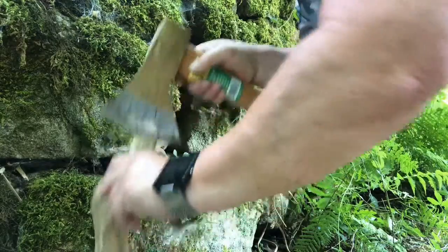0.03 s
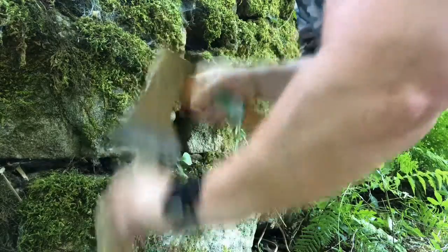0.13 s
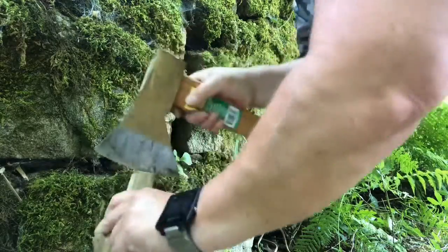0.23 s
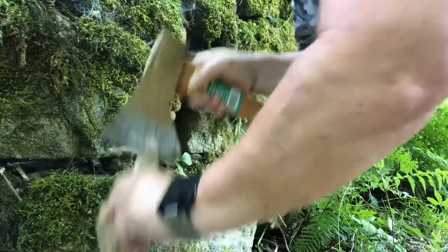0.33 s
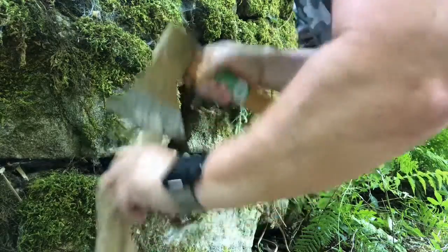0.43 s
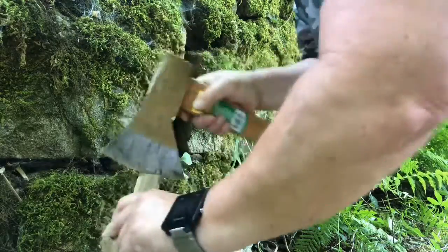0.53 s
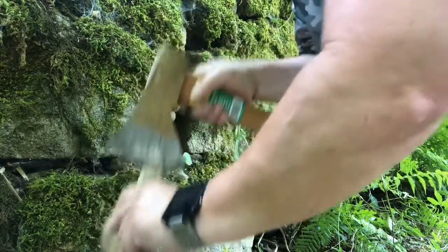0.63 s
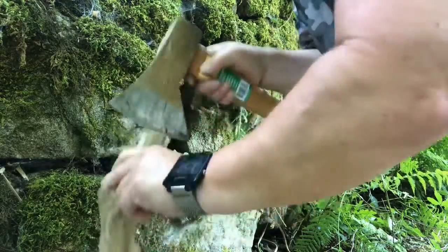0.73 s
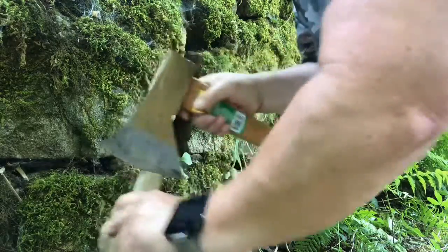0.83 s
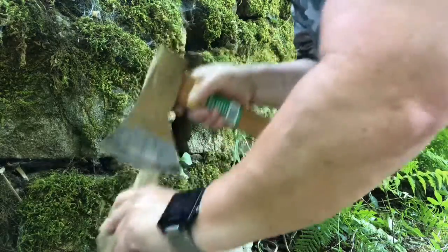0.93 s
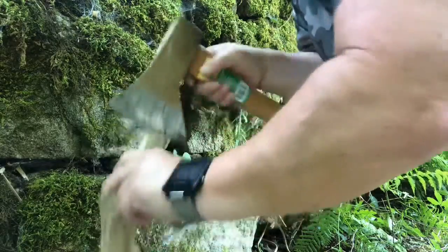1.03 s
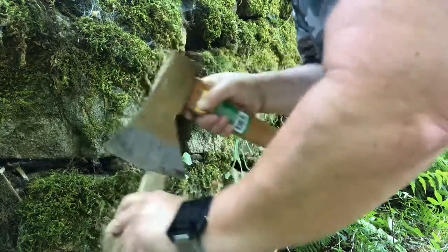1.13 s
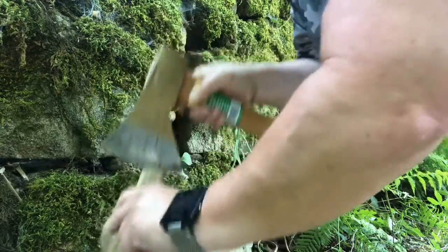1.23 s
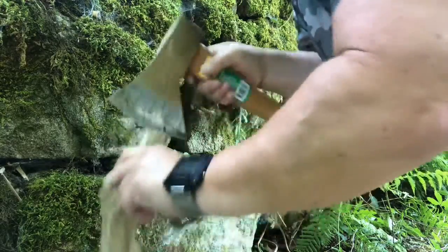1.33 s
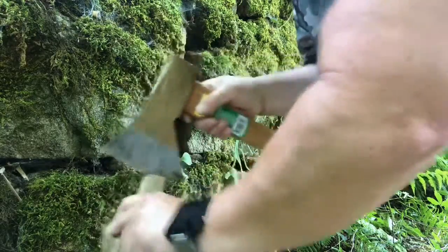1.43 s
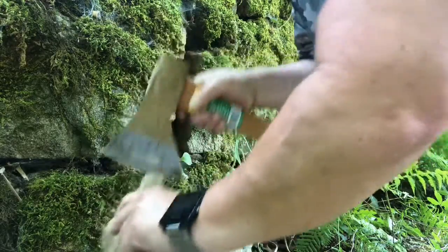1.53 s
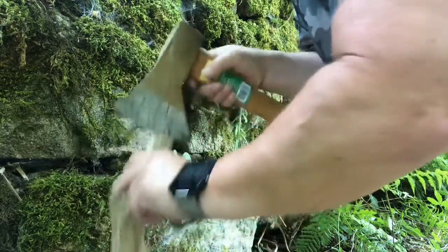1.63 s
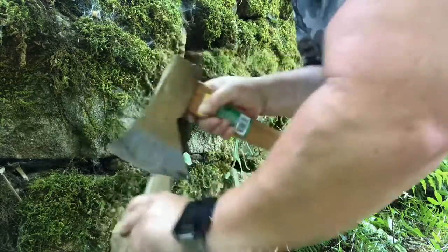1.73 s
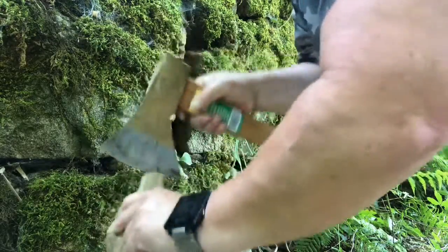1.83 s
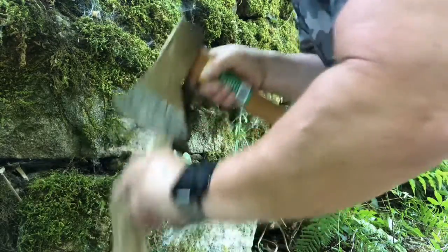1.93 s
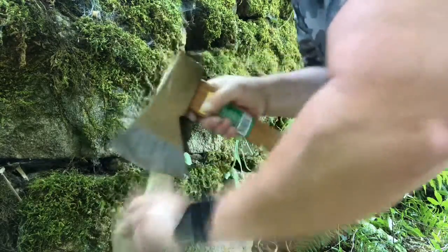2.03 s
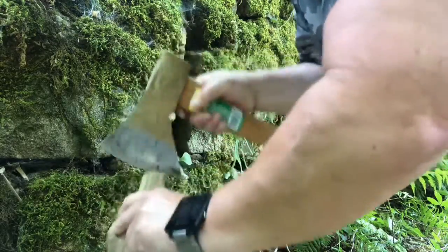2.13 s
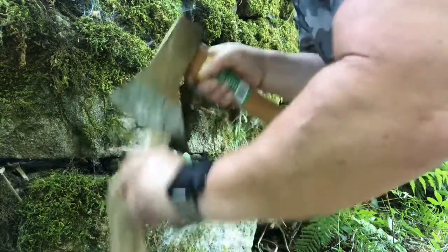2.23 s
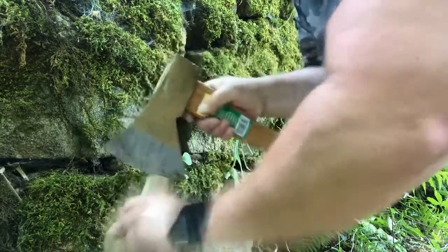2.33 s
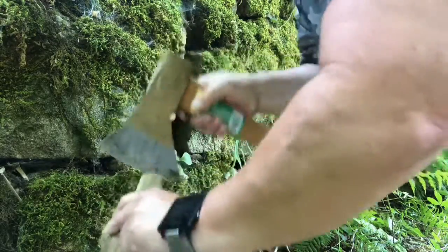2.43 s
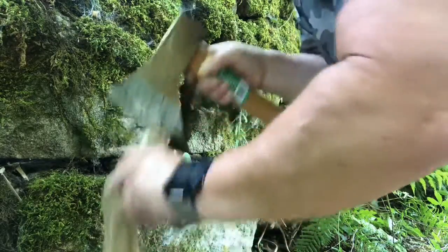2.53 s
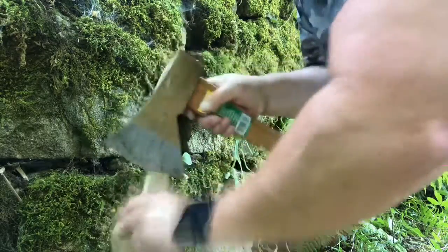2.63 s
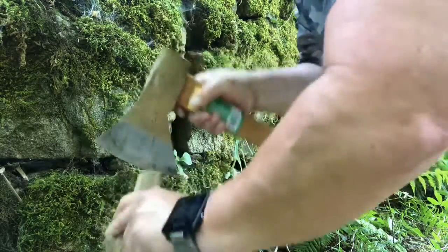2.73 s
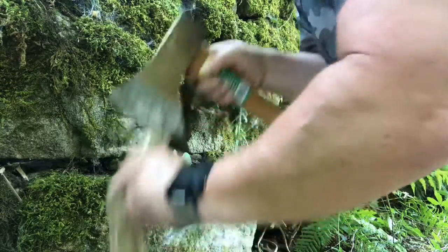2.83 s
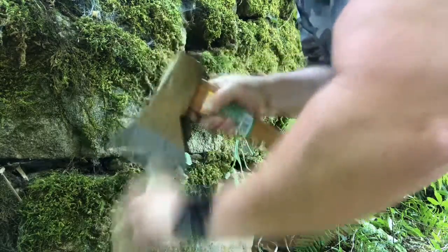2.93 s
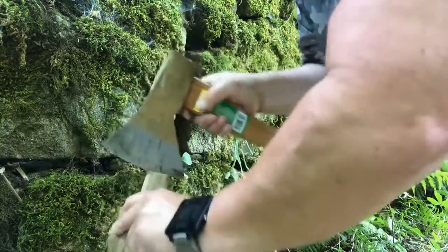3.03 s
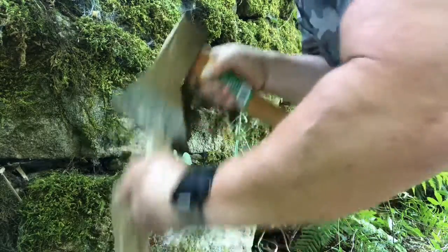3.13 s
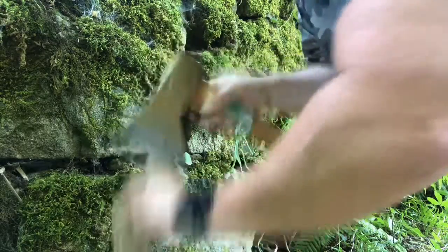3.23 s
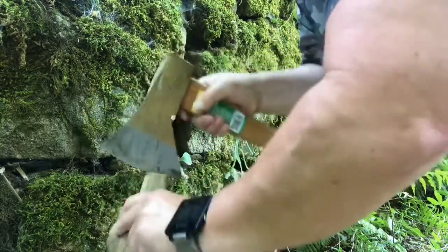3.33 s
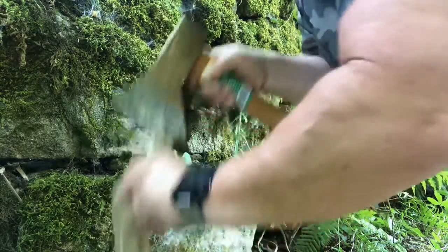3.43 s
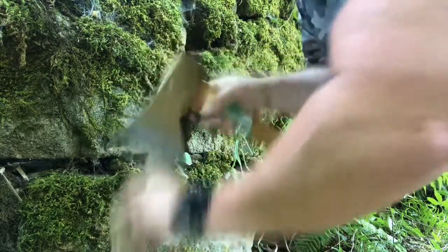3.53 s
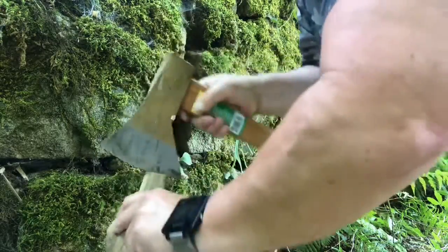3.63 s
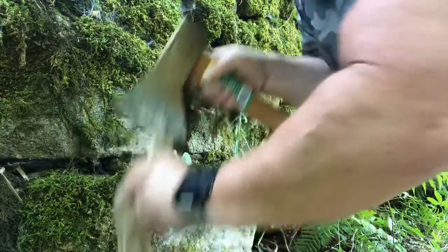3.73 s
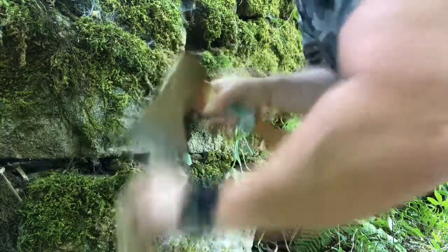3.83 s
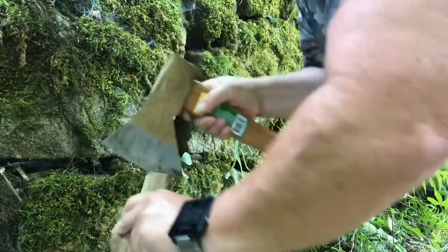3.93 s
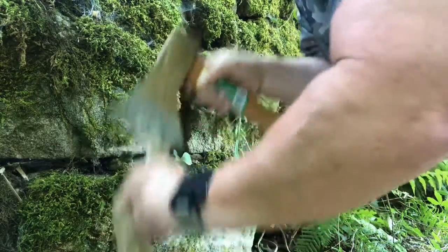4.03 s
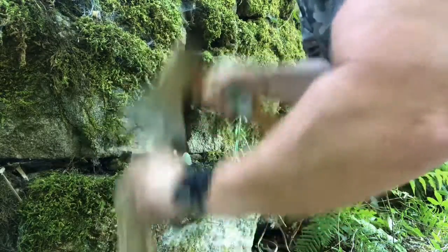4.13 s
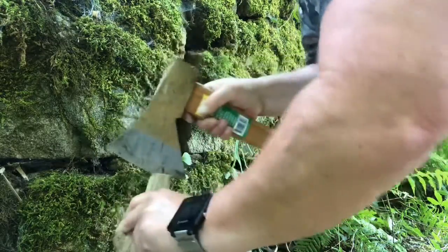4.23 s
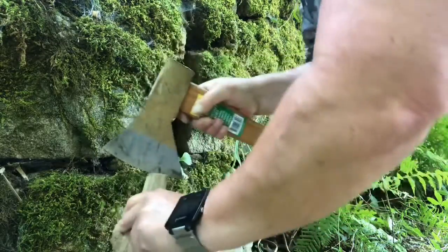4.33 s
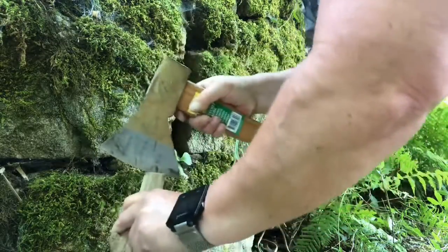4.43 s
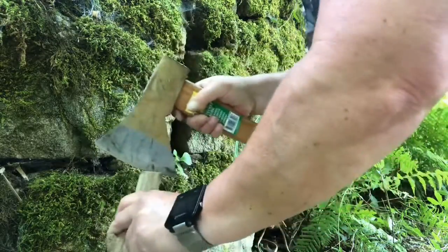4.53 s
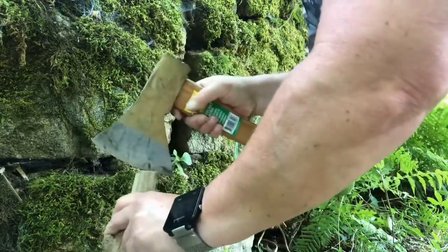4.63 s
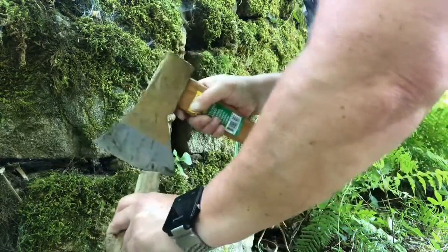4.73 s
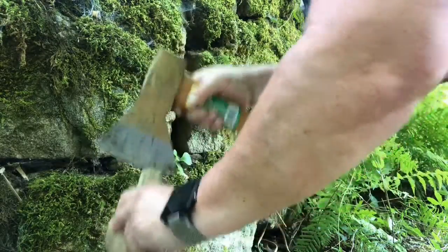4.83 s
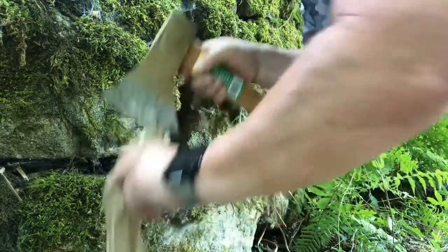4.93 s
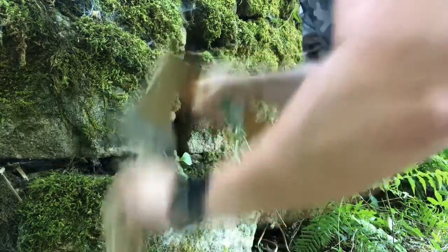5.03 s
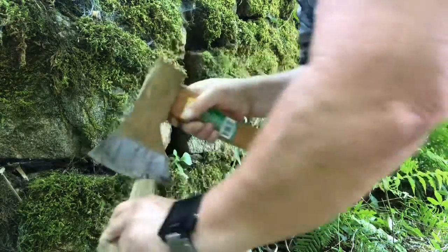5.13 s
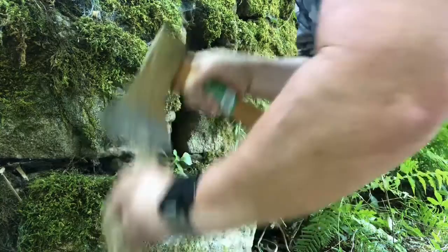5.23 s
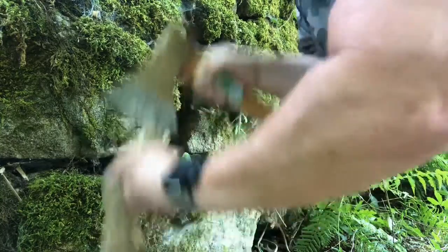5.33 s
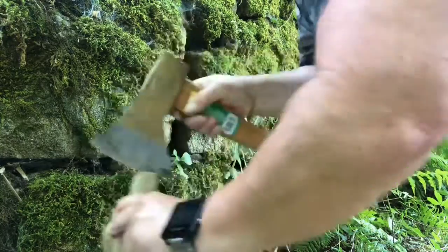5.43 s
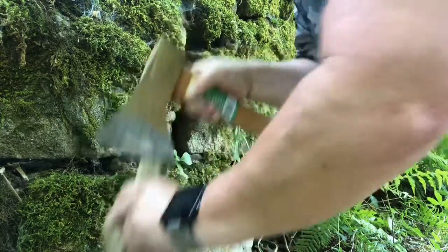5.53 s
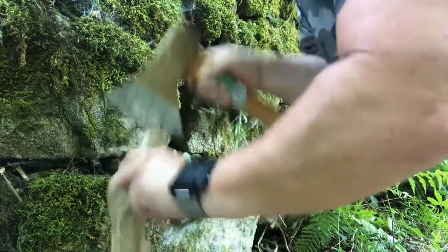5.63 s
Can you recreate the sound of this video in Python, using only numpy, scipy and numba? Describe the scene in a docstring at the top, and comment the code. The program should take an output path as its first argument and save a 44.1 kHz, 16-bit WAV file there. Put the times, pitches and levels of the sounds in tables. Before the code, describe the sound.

A hatchet stuck in the end of a dry stick is banged down with it on a mossy rock, heard close up through a phone. From 0.1 to about 4.2 seconds come fourteen sharp, woody knocks, evenly paced at about three a second and varying a little in strength and hollowness. Each has a crack of splitting fibres, a very short steel ring and a low thud through the ground just after it. Faint wood scrapes and tiny fibre ticks fall between the blows. Near 1.7 seconds the stick bounces with a light knock and a snap, and at 1.8 the blade gives one sharp tap. From 4.2 to 5 seconds the pounding pauses, leaving only tiny scrapes. Three more blows land at about 5.0, 5.4 and 5.7 seconds. A very faint forest hush of leaves and air lies underneath throughout.

```python
"""Sharp, woody knocks, about three a second: a hatchet stuck in the end of a dry stick is banged down
with it on a mossy rock. Each blow cracks the fibres, knocks the stick, rings the steel and sends a
late thud through the ground. Between blows wood scrapes, fibres tick and the blade taps once, over the
hush of a forest. A phone close by picks it up, and its limiter holds the peaks."""
import sys
import numpy as np
from scipy import signal
from scipy.fft import rfft, irfft
from scipy.io import wavfile
from scipy.ndimage import uniform_filter1d, minimum_filter1d
from numba import njit

SR = 44100
rng = np.random.default_rng(int(sys.argv[2]) if len(sys.argv) > 2 else 0)


def generate_wav(sig):
    """Save sig (samples, or channels by samples) to the path in sys.argv[1] as 16-bit PCM at SR."""
    pcm = np.round(np.clip(np.atleast_2d(sig).T, -1, 1) * 32767).astype(np.int16)
    wavfile.write(sys.argv[1], SR, pcm)


N = 250929


def undb(db):
    return 10 ** (np.asarray(db) / 20)


def coloured(table, size):
    """Noise of rms 1 with a (Hz, dB) spectrum."""
    hz, db = np.transpose(table)
    bins_hz = np.maximum(np.arange(size // 2 + 1) * SR / size, 1.)
    gain = undb(np.interp(np.log(bins_hz), np.log(hz), db))
    noise = irfft(rfft(rng.standard_normal(size)) * gain, size)
    return noise / np.std(noise)


def band(x, lo_hz, hi_hz):
    """Band-pass, scaled to rms 1."""
    sos = signal.butter(2, [lo_hz, min(hi_hz, .45 * SR)], "bandpass", fs=SR, output="sos")
    y = signal.sosfilt(sos, x)
    return y / np.std(y)


def swell(t, rise_s):
    """Envelope of a resonance driven through another: climbs to 1 at rise_s, then dies."""
    u = np.maximum(t, 0) / max(rise_s, 1e-4)
    return u * np.exp(1 - u)


def walk(rate_hz, size):
    """Ramps between random levels; spread near 1."""
    hold = max(int(SR / rate_hz), 1)
    steps = np.repeat(rng.standard_normal(size // hold + 1), hold)
    return 1.2 * uniform_filter1d(steps, hold)[:size]


def add(out, start_s, sound):
    """Mix a sound in at start_s."""
    i = int(start_s * SR)
    out[i:i + len(sound)] += sound[:N - i]


# Forest hush spectrum. Each row: frequency in Hz, relative density in dB.
FOREST_SPECTRUM = [(25, -14), (63, 3), (125, -1.5), (250, -5.5), (500, -8), (1000, -14), (2000, -18),
                   (3200, -20.5), (5000, -19), (7500, -22), (8500, -23), (10000, -25.5), (13000, -24),
                   (16500, -30)]
def forest(level_db=-53.7):
    """Hush of leaves and air; bass and treble flicker independently."""
    hush = coloured(FOREST_SPECTRUM, N)
    bass = signal.sosfilt(signal.butter(2, 700, fs=SR, output="sos"), hush)
    treble = hush - bass
    return undb(level_db) * (bass * undb(1.5 * walk(18, N)) + treble * undb(.7 * walk(36, N)))


# Fibres snapping singly. Each row: start in seconds, level above 7 kHz in dB.
FIBRE_SNAPS = [(1.0025, -42), (1.568, -25.5), (1.6415, -53), (1.706, -22), (1.718, -43.5), (1.8841, -44),
               (2.539, -49), (2.7574, -48), (3.125, -44), (3.456, -34), (4.175, -38)]
def snaps(faint_per_s=18, faint_base_db=-56):
    """Clear clicks of breaking fibres, and a sparse scatter of faint ones from chips and bark."""
    out, t = np.zeros(N), np.arange(int(0.0091 * SR)) / SR
    clear = [(start_s, db, db - 10.5) for start_s, db in FIBRE_SNAPS]
    when, smallness, tilt = rng.random((int(faint_per_s * N / SR), 3)).T
    faint_db = faint_base_db - 3 * np.log(.03 + smallness)
    tilt_db = 8 * (tilt - .5)
    faint = np.transpose([when * (N / SR - .02), faint_db + tilt_db, faint_db - tilt_db])
    for start_s, bright_db, mid_db in [*clear, *faint]:
        noise = rng.standard_normal(len(t))
        click = undb(bright_db) * band(noise, 7000, SR / 2) + undb(mid_db) * band(noise, 2800, 7000)
        add(out, start_s, click * (swell(t, 0.0003) + 0.14 * np.exp(-t / .0015)))
    return out


# Short scrapes of wood and one sharp tap of the blade. Each row: peak time in seconds, level in dB,
# relative dull level in dB, relative clink level in dB, swell in ms, fade in ms.
SCRAPES_AND_TAP = [(0.267, -42.5, -9, -9, 2., 4.), (0.899, -38.5, -7, -9, 5., 7.7),
                   (1.503, -41, 3, -7, 6., 6.2), (1.8165, -20, -12, -12, .3, 3.),
                   (2.42, -52, -12, -15, 5.6, 6.3), (2.721, -47.5, -19, -15, 5.6, 9.3),
                   (3.33, -47, -18, -12, 3.9, 5.5), (3.654, -50, -12, -18, 2.5, 4.),
                   (3.715, -53, -4, -18, 2.2, 3.2), (4.39, -54, 12, -8, 3., 7.3),
                   (4.697, -62, 19, -14, 2.3, 5.), (4.80, -51, -17, -9, 2., 8.7),
                   (5.476, -37.5, -4, -20, 1.9, 7.5), (.585, -48, -10, -30, 10, 10),
                   (5.176, -44, -12, -28, 20, 7), (5.596, -49, -10, -30, 6, 8)]
def scrapes_and_tap(lead_s=.05, bright_db=-3):
    """Grainy friction swells, clinks the steel at its peak and fades; the tap peaks almost at once."""
    out, t = np.zeros(N), np.arange(int(.09 * SR)) / SR
    since_ms = 1000 * (np.arange(int(2 * lead_s * SR)) / SR - lead_s)
    for peak_s, db, dull_db, clink_db, swell_ms, fade_ms in SCRAPES_AND_TAP:
        envelope = np.exp(np.where(since_ms < 0, since_ms / swell_ms, -since_ms / fade_ms))
        grains = rng.standard_normal(len(since_ms)) * undb(3.3 * walk(700, len(since_ms)))
        mid = band(grains, 1790, 7400)
        bright = undb(bright_db) * band(grains, 5800, 13400)
        dull = undb(dull_db) * band(grains, 200, 730)
        add(out, peak_s - lead_s, undb(db) * envelope * (mid + bright + dull))
        add(out, peak_s, steel(t, db + clink_db, db + clink_db, grazed=True))
    return out


# Splitting wood spectrum. Each row: frequency in Hz, relative density in dB.
RASP_SPECTRUM = [(300, -3.5), (700, -8), (1200, -7), (1800, -3), (2500, -10.5), (3400, -8), (4300, -15.5),
                 (7000, -20.5), (14000, -30.5)]
def rasp(t, firm_db):
    """What a loosely seated blow loses goes into splitting wood: a louder, longer rasp."""
    decay_ms = max(23.7 - 0.89 * firm_db, 10)
    level_db = -39 - 0.39 * firm_db + 1.5 * walk(600, len(t))
    return undb(level_db) * np.exp(-t * 1000 / decay_ms) * coloured(RASP_SPECTRUM, len(t))


# Modes of the rock on its soft bed. Each row: frequency in Hz, relative level in dB, rise in ms,
# delay in ms.
GROUND_MODES = [(70, 0, 12.3, 10.5), (114, -16, 15.5, 14.9), (49.5, -16, 19., 18.), (86, -21, 32., 9.6)]
def thud(t):
    """Pushed down by the blow, the ground answers late and slowly with beating low modes."""
    out = 0
    for hz, db, rise_ms, delay_ms in GROUND_MODES:
        since = t - delay_ms / 1000
        out -= undb(db) * swell(since, rise_ms / 1000) * np.sin(2 * np.pi * hz * since)
    return out


# Modes of the steel head. Each row: part (0 eye, 1 blade), frequency in Hz, relative level in dB when
# banged, the same when grazed, nominal T60 in seconds.
STEEL_MODES = [(0, 1002, -4, -10, 0.083), (0, 515, -6, -34, .06), (1, 3350, 9.5, -0.5, 0.022),
               (1, 3370, -25.5, -16, .08), (1, 1905, -6, 0, .04), (1, 5130, -19, 8, .028),
               (1, 6544, -14, -14, 0.028), (1, 7940, -15.5, -14, 0.025), (1, 9560, -24, -8, .03),
               (1, 13680, -24.5, 3, .02)]
def steel(t, eye_db, blade_db, grazed):
    """The head rings on after the wood has stopped; a graze wakes the thin high modes."""
    out = 0
    for is_blade, hz, bang_db, graze_db, t60_s in STEEL_MODES:
        scatter, grip, detune = rng.standard_normal(3)
        db = (blade_db if is_blade else eye_db) + (graze_db if grazed else bang_db) + 2 * scatter
        # the wood clamps the head differently each time, shifting and damping the ring
        hz *= 1 + 0.004 * detune
        t60_s *= np.exp(0.13 * grip)
        out += undb(db - 60 * t / t60_s) * np.sin(2 * np.pi * hz * t)
    return out * (1 - np.exp(-t / 0.00032))


# Cracking fibre spectrum. Each row: frequency in Hz, relative density in dB.
CRACK_SPECTRUM = [(1470, -24), (2500, -2), (2970, -13), (3540, -8), (4740, -12.5), (7730, -20.5),
                  (8500, -25.5), (12900, -24), (15000, -30), (16500, -44.5)]
def crack(t):
    """Fibres snap in uneven bursts, thickest at first contact."""
    envelope = swell(t - 0.0004, 0.00084) + 0.2 * swell(t, 0.0028)
    bursts = undb(5.2 * walk(1500, len(t)))
    return envelope * bursts * coloured(CRACK_SPECTRUM, len(t))


# Modes of the stick. Each row: part (0 knock, 1 hollow, 2 body), frequency in Hz at a stick pitch of
# 1700 Hz, relative level in dB, rise in ms, delay in ms.
STICK_MODES = [(0, 1688, 11, 0.85, 0.5), (0, 2043, 2.5, 1., 0.4), (0, 2470, -3, 1.3, 0.2),
               (0, 1191, -4.5, 1.4, 0.7), (1, 790, 12, 1.6, 1.9), (1, 893, 0.5, 1.7, 1.2),
               (1, 560, 2, 1.6, 3.2), (2, 305, 11, 1.4, 4.0), (2, 397, 5, 1.6, 4.3),
               (2, 210.1, -6, 5.3, 1.46)]
# Exponents by which knock, hollow and body follow the stick pitch.
PITCH_EXPONENTS = [0.68, 0.4, 0.15]
def stick(t, pitch_hz, knock_db, hollow_db, body_db):
    """Bending waves are faster in the treble, so low modes tend to arrive later and swell more slowly."""
    out = 0
    for part, hz, db, rise_ms, delay_ms in STICK_MODES:
        detune, scatter = rng.standard_normal(2)
        hz *= (pitch_hz / 1700) ** PITCH_EXPONENTS[int(part)] * (1 + 0.034 * detune)
        db += (knock_db, hollow_db, body_db)[int(part)] + 1.2 * scatter
        since = t - delay_ms / 1000
        out += undb(db) * swell(since, rise_ms / 1000) * np.sin(2 * np.pi * hz * since)
    return out


# Landings after a hop. Each row: start in seconds, knock level in dB.
STICK_REBOUNDS = [(0.4925, -31.5), (1.708, -22)]
def rebounds(pitch_hz=1510):
    """The stick hops off the rock and lands again with a light knock."""
    out, t = np.zeros(N), np.arange(int(.3 * SR)) / SR
    for start_s, db in STICK_REBOUNDS:
        add(out, start_s, stick(t, pitch_hz, db, hollow_db=db - 12.5, body_db=db - 12.5))
    return out


# Blows on the rock. Each row: start in seconds, knock level in dB, stick pitch in Hz, then levels in dB
# of the seat on the rock (the hollow modes), the crack, the eye ring and the blade ring.
HATCHET_BLOWS = [(0.1309, -9, 1513, -13.5, -12.5, -16.5, -24),
                 (0.4704, -15.5, 1525, -20.5, -15.5, -21.5, -47.5),
                 (0.7908, -5, 1694, -17, -14, -22.5, -23), (1.092, -11.5, 1760, -19, -22.5, -19, -31),
                 (1.3902, -5.5, 1517, -19, -13, -24, -26), (1.6991, -20, 1850, -14.5, -12, -11.5, -21),
                 (2.012, -6, 1755, -18, -13, -15.5, -17.5), (2.3111, -8.5, 1590, -16, -15.5, -17, -20.5),
                 (2.612, -4.5, 1646, -14.5, -10.5, -18, -33), (2.9222, -13.5, 1790, -26.5, -16.5, -37, -23),
                 (3.2294, -13.5, 1724, -26, -21.5, -21, -18),
                 (3.5278, -11.5, 1746, -26, -18.5, -26.5, -23.5),
                 (3.8319, -13.5, 1807, -28, -18, -17, -19.5), (4.15, -10, 1702, -20, -11.5, -13, -10.5),
                 (5.0385, -12, 1690, -22.5, -13, -21.5, -26), (5.3673, -10.5, 1660, -22.5, -10, -11, -20),
                 (5.675, -13, 1450, -15.5, -11.5, -13.5, -23.5)]
def blows(firm_seat_db=-12):
    """Stick and hatchet hit the rock together; a well seated blow sounds hollow and full."""
    out, t = np.zeros(N), np.arange(int(.3 * SR)) / SR
    for start_s, knock_db, pitch_hz, seat_db, crack_db, eye_db, blade_db in HATCHET_BLOWS:
        firm_db = seat_db - firm_seat_db
        splitting = undb(crack_db) * crack(t) + rasp(t, firm_db)
        wood = stick(t, pitch_hz, knock_db, hollow_db=seat_db, body_db=-12 + 0.73 * firm_db)
        ring = steel(t, eye_db, blade_db, grazed=False)
        ground = undb(-15.5 + 0.3 * firm_db) * thud(t)
        add(out, start_s, splitting + wood + ring + ground)
    return out


def scene():
    return (blows() + rebounds() + scrapes_and_tap() + snaps() + forest())[None]


@njit
def limiter_gain(allowed, release_per_sample):
    """Gain drops at once and climbs back gradually."""
    gain, g = np.empty(len(allowed)), 1.
    for i in range(len(allowed)):
        g = min(allowed[i], g + (1 - g) * release_per_sample)
        gain[i] = g
    return gain


def record(dry):
    """The capsule drops the deepest bass, a look-ahead limiter holds the peaks, the top is cut."""
    low_hz, top_hz = 42, 16700
    ceiling, release_ms, ahead_samples = 0.89, 4, 24
    mic = signal.sosfilt(signal.butter(2, low_hz, "highpass", fs=SR, output="sos"), dry)
    allowed = np.minimum(1, ceiling / (np.abs(mic[0]) + 1e-9))
    allowed = minimum_filter1d(allowed, size=2 * ahead_samples + 1)
    gain = limiter_gain(allowed, 1000 / (release_ms * SR))
    limited = mic * uniform_filter1d(gain, size=ahead_samples)
    return signal.sosfilt(signal.ellip(10, .2, 70, top_hz, fs=SR, output="sos"), limited)


dry = scene()
out = record(dry)
generate_wav(out)
```